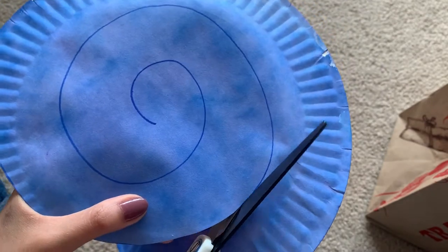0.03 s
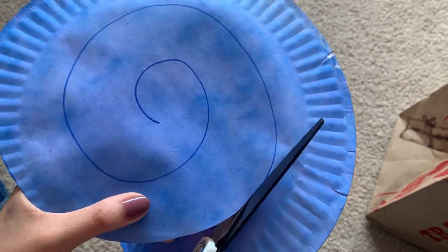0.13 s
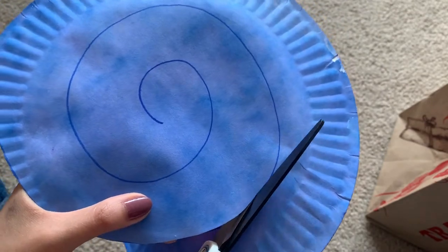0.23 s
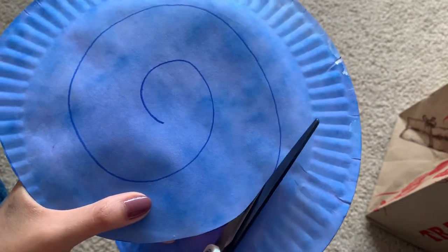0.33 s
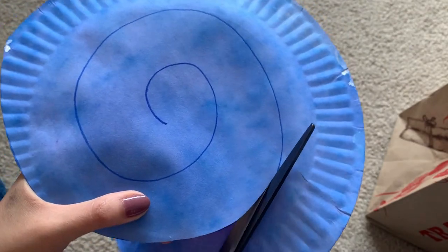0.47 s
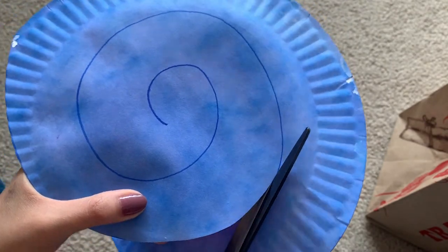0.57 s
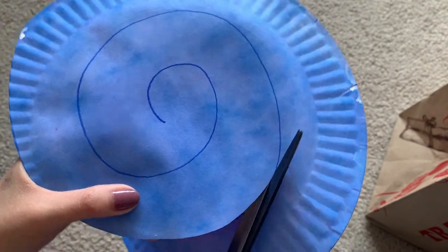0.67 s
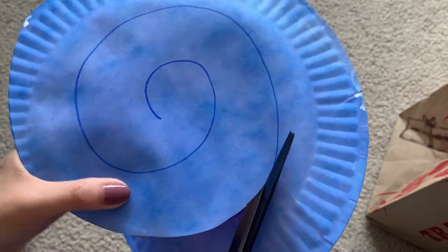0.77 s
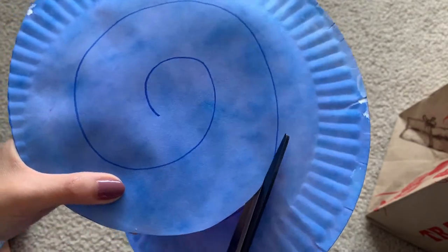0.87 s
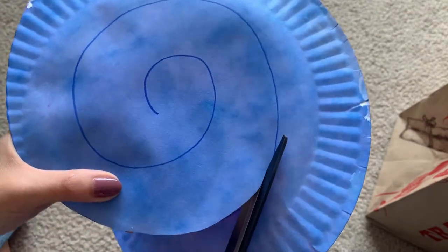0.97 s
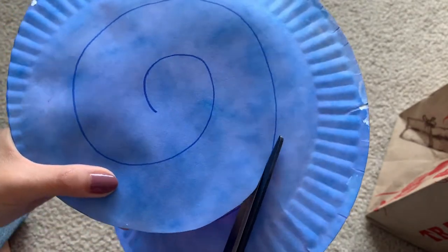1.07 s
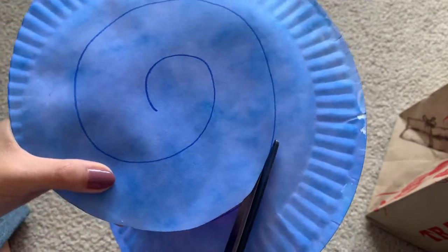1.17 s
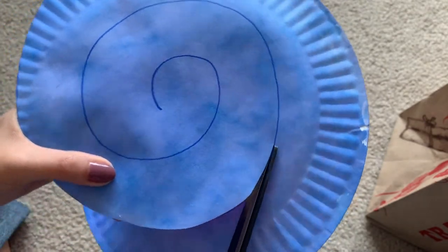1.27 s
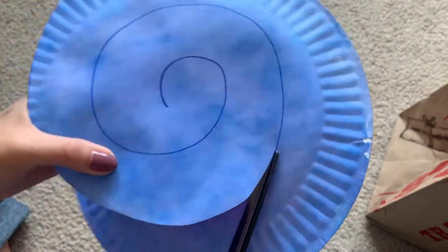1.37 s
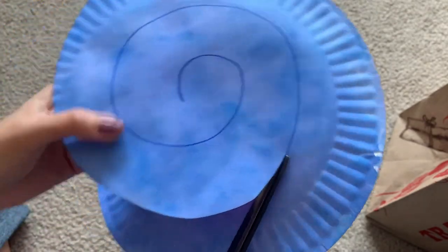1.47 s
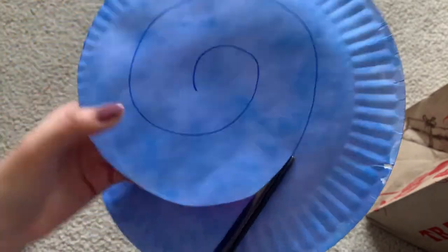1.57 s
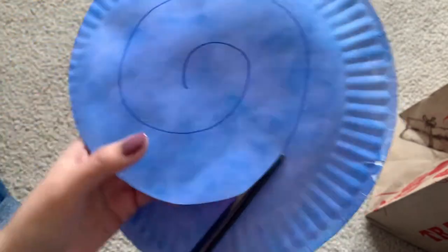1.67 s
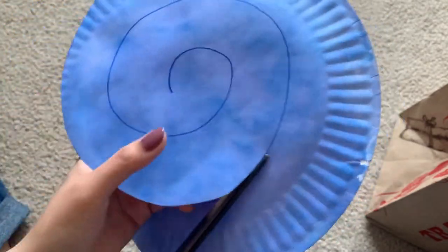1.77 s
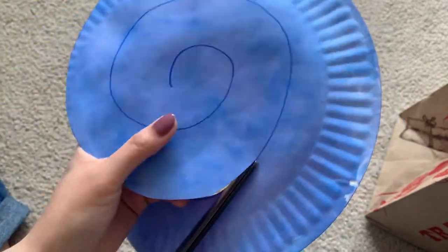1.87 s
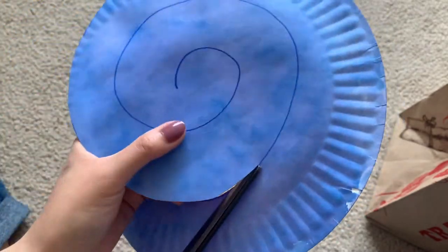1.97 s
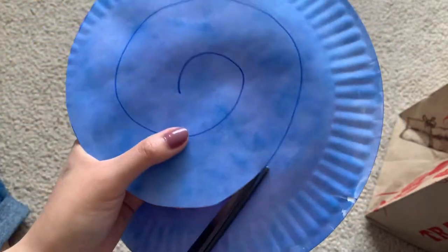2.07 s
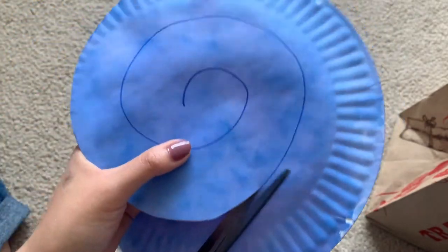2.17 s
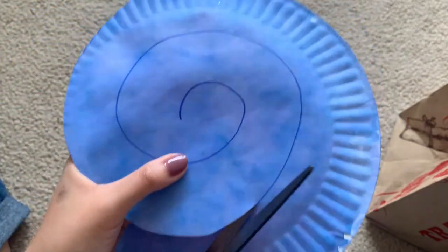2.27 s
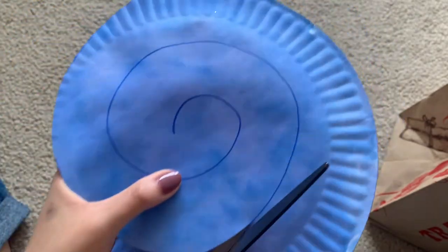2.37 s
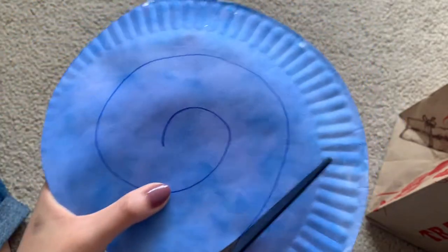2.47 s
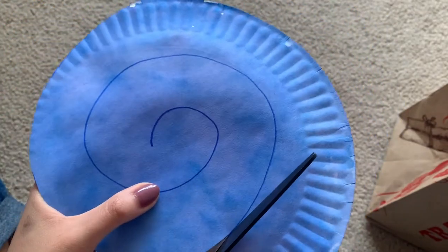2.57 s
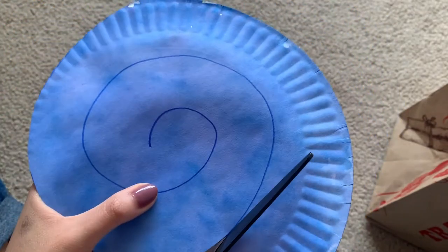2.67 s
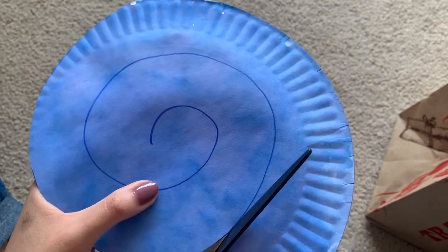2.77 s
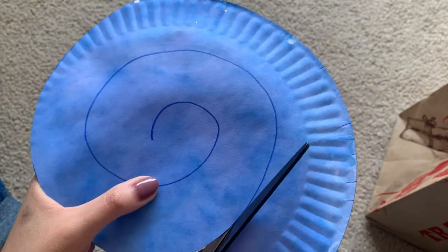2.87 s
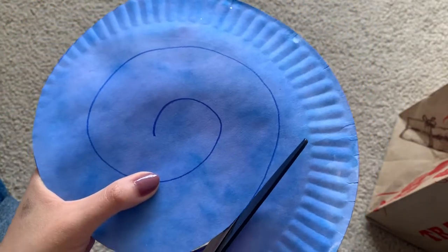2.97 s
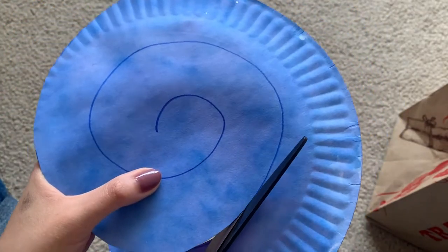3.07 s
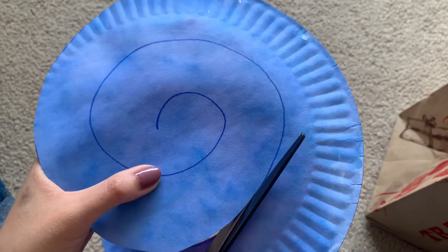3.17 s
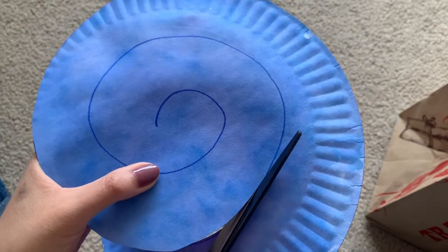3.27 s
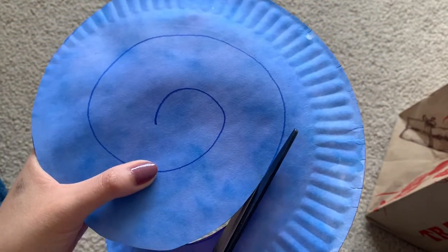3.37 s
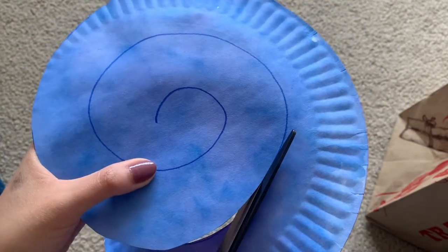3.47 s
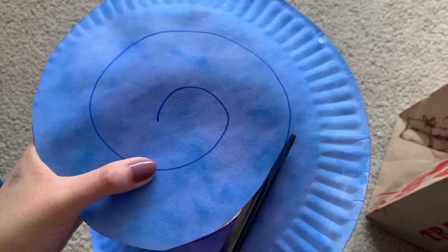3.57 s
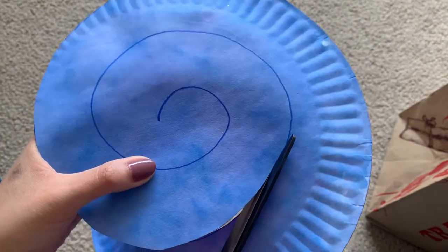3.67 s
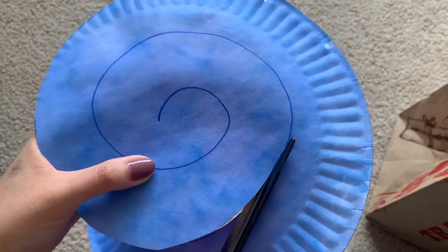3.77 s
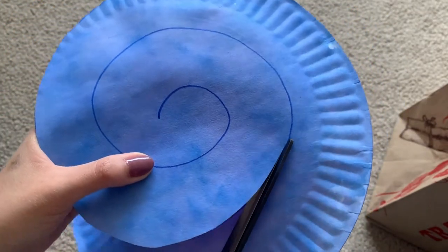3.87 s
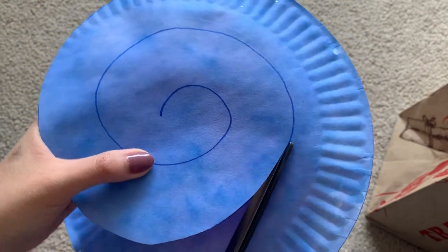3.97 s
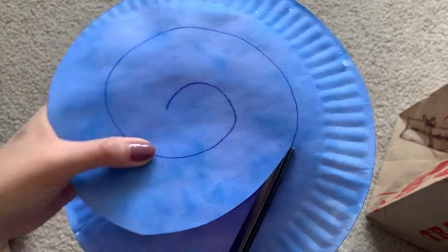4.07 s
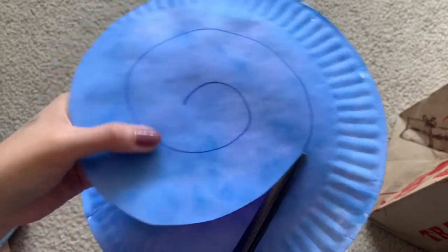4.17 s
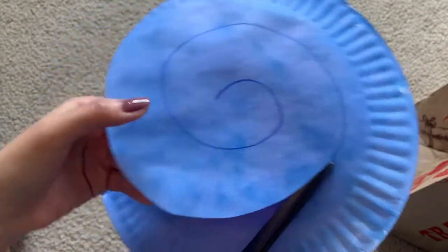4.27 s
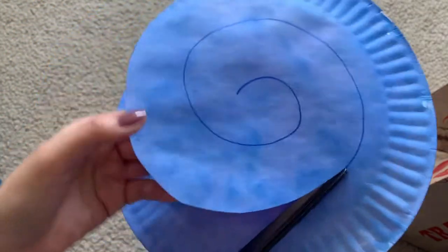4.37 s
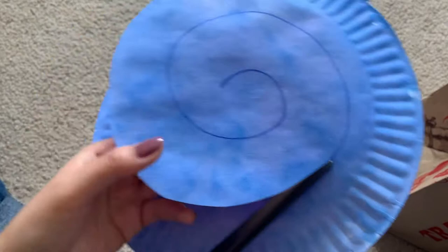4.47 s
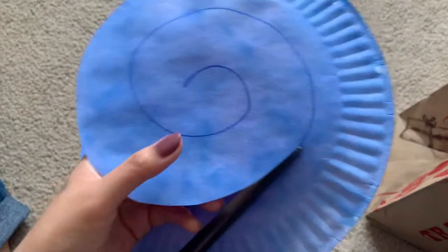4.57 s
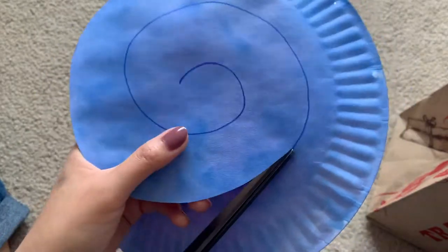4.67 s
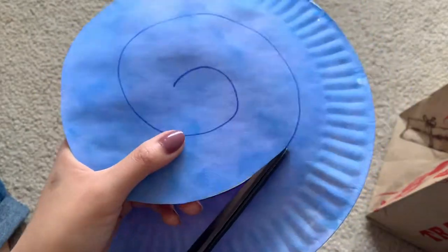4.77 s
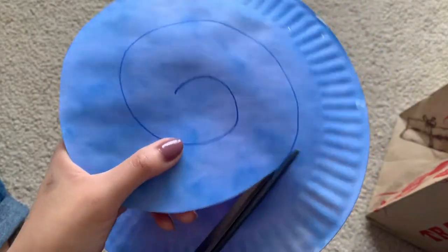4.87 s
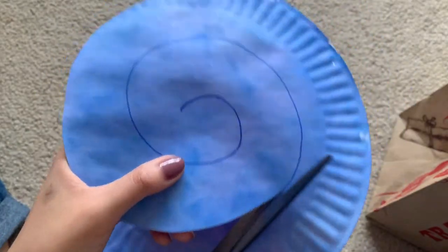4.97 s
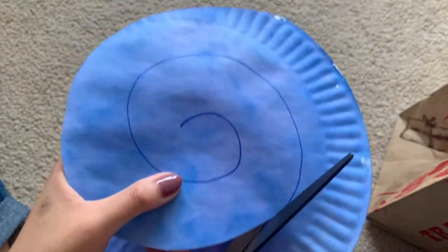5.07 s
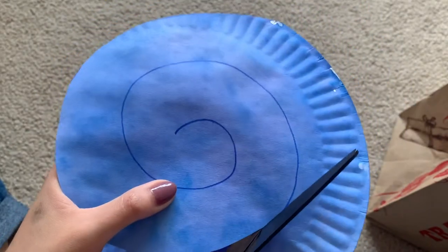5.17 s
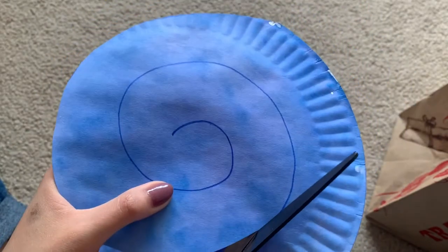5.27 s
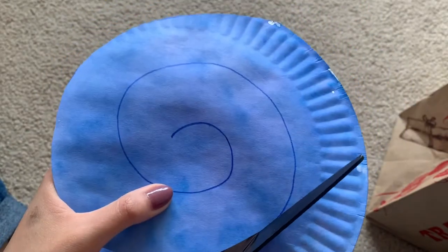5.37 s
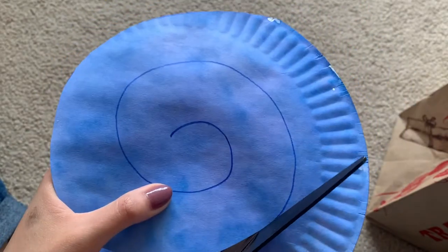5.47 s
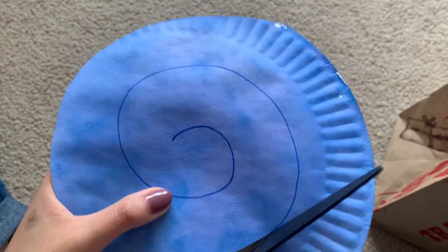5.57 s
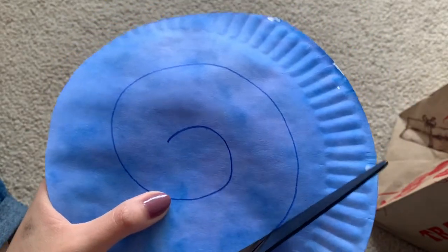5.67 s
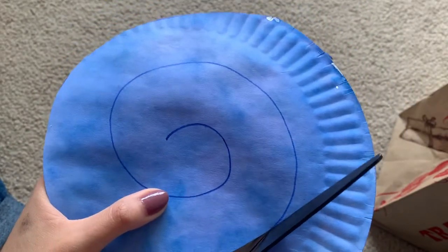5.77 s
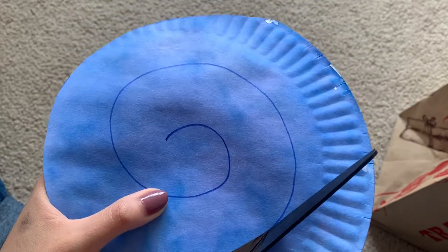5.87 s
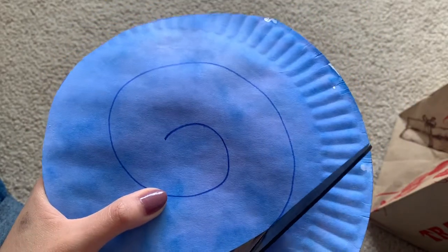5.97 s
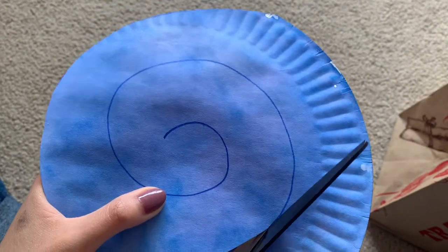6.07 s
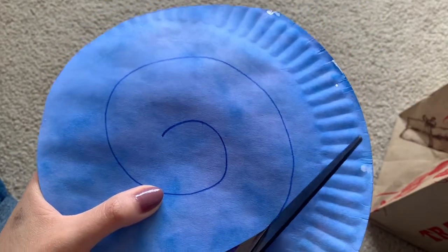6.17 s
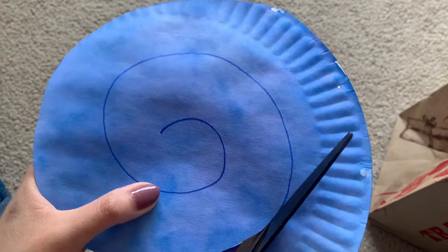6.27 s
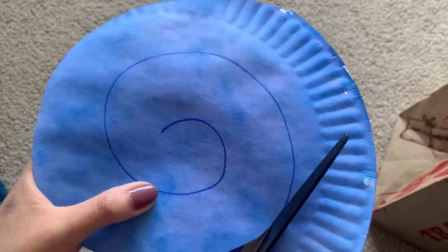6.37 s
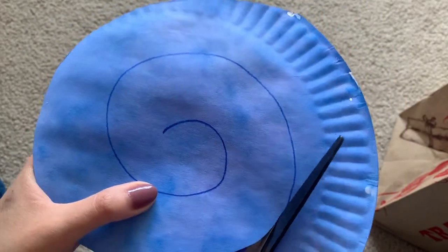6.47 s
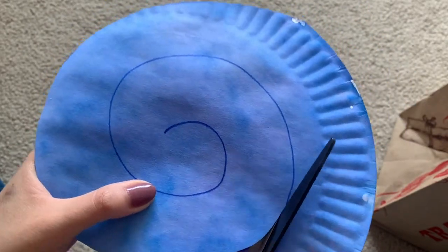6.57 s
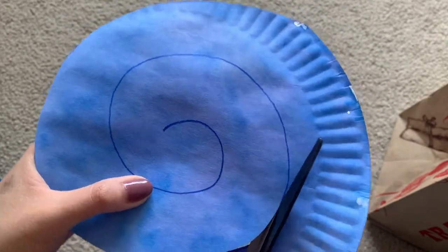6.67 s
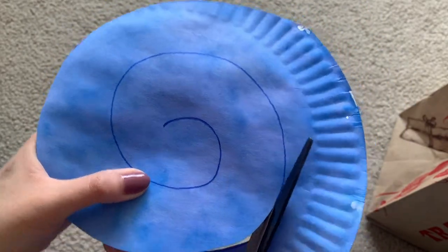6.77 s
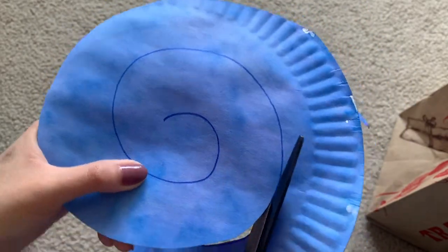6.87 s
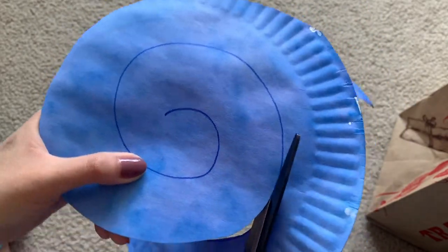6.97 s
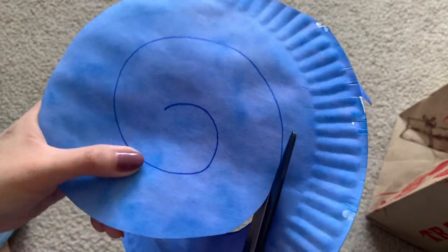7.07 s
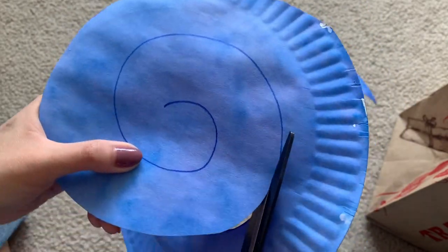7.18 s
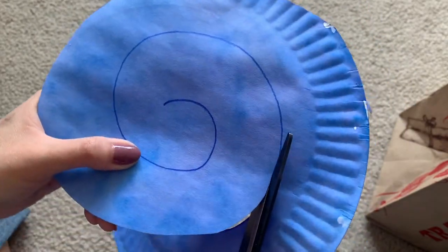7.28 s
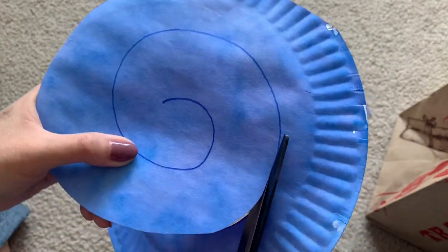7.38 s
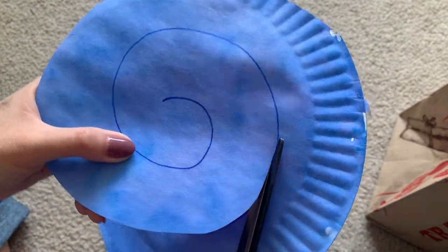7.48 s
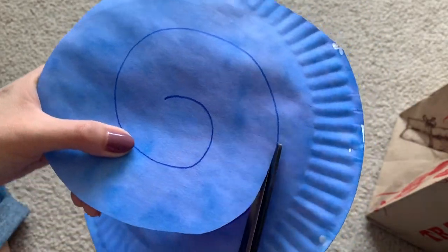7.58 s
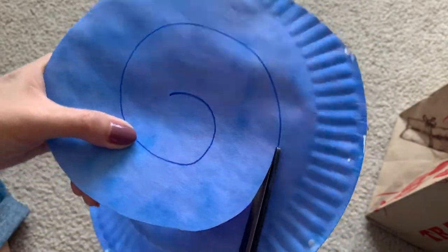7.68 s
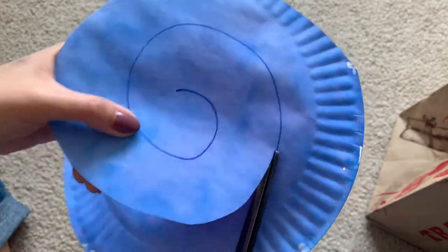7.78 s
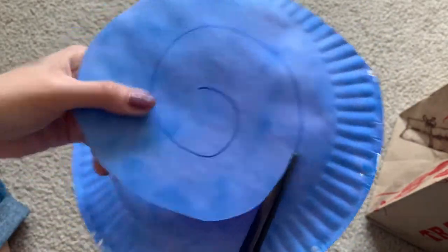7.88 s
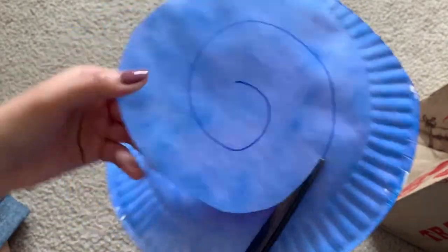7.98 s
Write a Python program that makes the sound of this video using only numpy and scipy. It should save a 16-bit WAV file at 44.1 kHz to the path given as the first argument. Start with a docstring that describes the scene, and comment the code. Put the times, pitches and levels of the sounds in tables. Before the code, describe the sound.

Close, dry snips and ripping crackles of scissors in stiff paper, broken by soft handling rustles and hollow plate knocks over a faint hum.

```python
"""Scissors cut a stiff paper plate held close to a two-port microphone in a carpeted room.
0-1.3 s: blades bite in jerks; each slip is an enveloped grain burst, coloured as tear and plate ring.
1.3-2.7 s: the plate is turned; filtered catches rub on steel and fingers, low resonances flex.
2.7-4.1 s: second cut; 4.1-5.7 s: turning again; 5.7-7.7 s: third cut, hardest slip near 7.5 s; then rubbing.
Throughout: decaying sines knock, bands of grains rasp, the plate wobbles; shaped noise hums under it all."""
import sys
import numpy as np
from scipy import signal
from scipy.fft import rfft, irfft, next_fast_len
from scipy.io import wavfile

SR = 44100
rng = np.random.default_rng(int(sys.argv[2]) if len(sys.argv) > 2 else 0)


def output_pcm(signal):
    """Save a mono or channel-first signal as 16-bit PCM at the path in sys.argv[1].

    Samples are clipped to [-1, 1] before scaling.
    """
    pcm = np.clip(np.atleast_2d(signal).T, -1, 1) * 32767
    wavfile.write(sys.argv[1], SR, np.round(pcm).astype(np.int16))


N = 354343
SIZE = next_fast_len(N)   # transform length, samples

# Slips of the blades: t/s, tear level/dB, plate ring re tear/dB (both before layer trims)
SLIPS = [(0.023, -44.5, 3.5), (0.073, -32, -0.5), (0.111, -48, 5), (0.132, -47, 10), (0.146, -47.5, 7.5),
         (0.168, -36, 5), (0.269, -29.5, 3.5), (0.296, -30, 2.5), (0.37, -37, -1), (0.404, -33.5, 3),
         (0.45, -28, -3), (0.485, -33, -6), (0.532, -21, -6.5), (0.567, -33, -6.5), (0.581, -37.5, -0.5),
         (0.6315, -30, 0.5), (0.748, -36, 3), (0.8198, -41.5, 7.5), (0.836, -31, 0.5), (0.88, -39.5, 6.5),
         (0.9202, -35.5, -3), (0.9398, -31, 2.5), (0.986, -37.5, 6.5), (0.9979, -39, 2), (1.0959, -22.5, 0),
         (1.119, -28, -3), (1.205, -16, -5), (1.255, -19, -7.5), (1.2935, -18, -9.5), (1.63, -50.5, -12),
         (2.0503, -41, 3.5), (2.7356, -41.5, -0.5), (2.775, -41.5, 0.5), (2.813, -38, 0.5),
         (2.851, -42.5, -0.5), (2.8777, -39.5, 3), (2.9113, -31.5, 0), (2.9516, -37.5, 4),
         (2.988, -51.5, 14), (3.014, -32.5, 2), (3.043, -34.5, 2), (3.0718, -37, -12), (3.127, -27.5, -1),
         (3.16, -41.5, 5), (3.197, -47.5, 0.5), (3.205, -41, -5.5), (3.2122, -19, -7), (3.263, -53.5, 2.5),
         (3.272, -39.5, 2), (3.281, -26, 0.5), (3.324, -37, 4), (3.3425, -28.5, -0.5), (3.378, -38.5, 1),
         (3.4119, -23, -3), (3.463, -38, 2), (3.504, -25, -1), (3.5271, -26, 0.5), (3.578, -43.5, 5),
         (3.696, -26.5, -4.5), (3.8279, -18.5, -8.5), (3.8326, -17.5, -12.5), (3.8546, -36.5, 2.5),
         (3.8707, -16.5, -12), (3.95, -32.5, -1.5), (3.975, -16, -9), (4.002, -43, 7.5), (4.014, -41, 7.5),
         (4.028, -16, -8.5), (4.066, -40.5, 6.5), (4.669, -48.5, -10), (4.797, -50.5, 4),
         (5.5717, -31.5, -7.5), (5.583, -27, -8.5), (5.9367, -47.5, 11.5), (6.026, -35.5, 0),
         (6.105, -53.5, 12.5), (6.136, -37.5, 4.5), (6.214, -42.5, 6.5), (6.266, -46.5, 15),
         (6.436, -44.5, 7), (6.472, -38, 7), (6.518, -35, 3), (6.574, -36.5, 3), (6.6192, -28, -1),
         (6.6858, -37.5, 1.5), (6.7123, -37.5, 2), (6.8038, -29, 0), (6.9415, -34.5, -2.5),
         (6.963, -36, -5), (6.982, -33, -1.5), (7.0329, -34, 6.5), (7.061, -31, 3), (7.075, -34, -3),
         (7.111, -44.5, 3), (7.198, -28, -7.5), (7.257, -25.5, -7.5), (7.2998, -27.5, -8.5),
         (7.35, -19.5, -9), (7.4561, -12, -11.5), (7.511, -29.5, -0.5), (7.5584, -30, -4),
         (7.655, -19, -5.5), (7.6743, -15, -11), (7.898, -31.5, -1.5)]
# Spans in which the blades close on paper: start/s, end/s
CUT_SPANS = [(0, 1.33), (2.73, 4.06), (5.75, 7.7)]
# Tear spectrum: f/Hz, relative density/dB
TEAR_SPECTRUM = [(1000, -37.5), (1330, 5), (1560, -12), (1970, 5.5), (3050, -1), (4590, 5), (7090, -4),
                 (10100, -12.5), (11600, -7), (14700, -14.5), (16500, -31)]
# Treble of the tearing as the cut moves along the blades: t/s, level/dB
TEAR_TREBLE = [(0, 4), (1.3, 6), (2.9, -2), (3.2, 5), (3.5, 8), (3.85, 1.5), (4.05, 8.5), (5.6, -26),
               (7.3, 3), (7.46, -3.5), (7.56, 6), (7.67, 1.5)]
# Broad resonances of the freshly cut edge: f/Hz, width/Hz, relative level/dB
EDGE_MODES = [(2970, 490, 6), (5166, 130, 18), (8610, 3400, 13.5)]
# Plate resonances: f/Hz, width/Hz, relative level/dB
RING_MODES = [(659, 120, 12.5), (797, 93, 17), (927.7, 144.4, 13), (1323.8, 155.5, 15.5), (1250, 1076, 8),
              (2077.7, 229, 11.5), (2448, 222.6, 1)]
# Upper flexing resonances: f/Hz, width/Hz, relative level/dB
FLEX_MODES = [(273.85, 91.8, -0.6), (335.7, 74.7, 2), (407.5, 74.6, -1.5)]
# Plate buckles and knocks: t/s, level before swell/dB, nominal f/Hz, fade by 8.7 dB/cycles
KNOCKS = [(0.44, -27.5, 332, 1.56), (0.488, -24, 373, 1.02), (0.532, -17, 419, 0.58),
          (0.885, -30, 356, 1.07), (0.923, -30, 337, 0.91), (0.943, -34.5, 385, 1.52),
          (1.129, -36.5, 233, 1.55), (1.226, -29.5, 142, 0.62), (1.309, -32.5, 823, 2.26),
          (1.639, -30.5, 191, 0.3), (2.3737, -34, 720, 1.23), (2.913, -35, 990, 4), (3.015, -39.5, 880, 4),
          (3.047, -42, 843.5, 6), (3.078, -40.5, 887, 1), (3.953, -32, 448, 1.27), (4.033, -25, 281.4, 1.6),
          (4.67, -39.5, 167, 1.15), (5.593, -33.5, 219, 0.27), (5.609, -24, 271.4, 0.5),
          (5.728, -55.5, 784, 5.5), (5.788, -54.5, 799.4, 4.5), (6.474, -28.5, 144.4, 0.92),
          (6.61, -23, 175.7, 0.63), (6.808, -34, 400, 0.9), (6.946, -32, 298, 1.06),
          (6.986, -30, 300, 0.68), (7.037, -27, 273, 0.84), (7.064, -23, 327, 0.52),
          (7.203, -37, 403, 2.04), (7.262, -44, 402, 4), (7.353, -35, 383.5, 2), (7.4875, -19.5, 739, 1.24),
          (7.489, -17.5, 340, 0.54), (7.497, -31.5, 163, 0.02), (7.662, -24.5, 303, 1.11),
          (7.682, -18, 316, 0.5048), (7.902, -26.5, 331, 0.87), (7.936, -22, 150, 0.4)]
# Cut edge rasps along the steel, and a short handling bump near 5.83 s: start/s, end/s, f/Hz, width/Hz,
# level/dB
RASPS = [(0.538, 0.62, 2400, 350, -63.5), (0.659, 0.757, 2460, 350, -50.5), (0.662, 0.724, 1217, 400, -52),
         (0.659, 0.759, 4100, 600, -55.5), (1.847, 1.919, 1995, 202, -59), (2.059, 2.25, 2144, 500, -58.5),
         (2.313, 2.478, 1963, 243, -57.5), (3.273, 3.284, 960, 300, -42), (3.407, 3.444, 2510, 300, -57.5),
         (5.094, 5.14, 1389, 590, -44.5), (5.106, 5.158, 2400, 398, -50.5),
         (5.301, 5.363, 939, 600.3, -59.5), (5.825, 5.85, 820, 200.3, -53), (6.26, 6.362, 1865, 500, -55),
         (6.826, 6.926, 2590, 500, -56), (6.83, 6.918, 1070, 500, -61.5), (7.463, 7.57, 3900, 2491, -54),
         (7.651, 7.683, 3930, 1490, -37)]
# Paper strokes on steel or fingers: start/s, end/s, hiss level at start/dB, at end/dB,
# then re hiss, before layer trims: treble/dB, plate ring/dB, upper flexing/dB, deep flexing/dB
STROKES = [(-0.05, 0.228, -51.5, -58.5, 4.5, 5, 16.5, 7.5), (0.269, 0.408, -49.5, -55, 5, 3.5, 20, 10),
           (0.416, 0.569, -57.5, -58.5, 0, 6, 12.5, 7.5), (0.564, 0.755, -52.5, -52.5, -0.5, 1, 8.5, -0.5),
           (0.78, 1.018, -49.5, -77.5, -3.5, -10, 17.5, -6), (1, 2.05, -77, -68.5, 4.5, -2, 5, 4.5),
           (1.034, 1.318, -66.5, -55.5, -7, -5, 18, 7), (1.418, 1.753, -60.5, -64, 8.5, -8.5, -1, -2),
           (1.741, 1.888, -63.5, -62.5, 8, -6, 0, -18.5), (1.855, 1.921, -54.5, -71.5, -26, -6.5, 17, 16.5),
           (2.036, 2.424, -53, -49, 6, -6, 1, -8), (2.444, 2.485, -39, -60, 10, 0, 12, 10.5),
           (2.706, 3.04, -65, -67.5, 1.5, 0, -12, 3.5), (2.99, 3.644, -70.5, -60.5, -3, 5, 10, 12),
           (3.704, 4.8, -76, -71, 2.5, -7, 6, 7), (3.77, 4.061, -69.5, -64.5, 0, 5, 23, 11.5),
           (4.162, 4.327, -56.5, -80, 7.5, -11, -6.5, -20), (4.411, 4.596, -68, -59, 10.5, -8, -9.5, -20.5),
           (4.794, 5.129, -52, -48.5, 7, -5.5, 3, -8.5), (5.144, 5.566, -70.5, -77.5, -22, 5, 19, 10.5),
           (5.561, 5.656, -41, -63.5, 5.5, -1.5, 12.5, 1), (5.7, 5.883, -85.5, -71.5, -8, 11.5, 23.5, 19),
           (5.928, 6.152, -54, -71, -19, 5, 12.5, 11), (6.157, 6.258, -52.5, -61.5, -8, 5, 12, 12),
           (6.25, 6.352, -53, -53, 1, 4.5, 8, 13.5), (6.407, 6.799, -52.5, -60, 4.5, 1, 14, 9),
           (6.775, 6.946, -53, -58.5, -8.5, -4, 2.5, 0.5), (6.926, 7.146, -71.5, -60.5, -17, -4, 16.5, 2),
           (7.161, 7.428, -86, -61.5, -22, -3, 19.5, 12.5), (7.462, 8.04, -52, -82, 1, -4.5, 14.5, 1.5),
           (7.826, 7.934, -54.5, -59.5, 9, -5, 2.5, 5)]
# Rubbing spectrum: f/Hz, relative density/dB
RUB_SPECTRUM = [(590, -79), (1000, -50.5), (1970, 5), (2500, 2.5), (3300, 3.5), (6380, 1), (7260, -0.5),
                (8860, -2.5), (10300, -8.5), (11500, -15.5), (12600, -10), (14500, -15), (15600, -15.5),
                (16500, -66)]
# Deep flexing resonances: f/Hz, width/Hz, relative level/dB
DEEP_FLEX_MODES = [(129.5, 98.6, 0.019), (206.8, 73.1, 0.014)]
# Whole plate wobbles in the hand: t/s, level before trim/dB
SWAY = [(0.0, -48.5), (0.29, -44.5), (1.03, -56.5), (1.23, -44.5), (1.52, -60), (1.65, -46.5),
        (1.94, -58.5), (4.09, -48.5), (4.38, -60), (4.65, -51.5), (5.61, -53.5), (6.15, -55), (6.51, -46),
        (6.82, -55), (7.47, -54.5), (8.03, -50)]
# Wobble pitch as the grip changes: t/s, f/Hz
GRIP = [(0, 98.67), (.8, 123.1), (1.6, 88.1), (2.0, 91.13), (2.1, 117.4), (2.5, 90.9), (3.7, 118.7),
        (6.1, 119), (6.3, 88.13), (6.9, 121.4), (7.7, 86.2), (8.03, 110.8)]
# Steady wobble resonance: f/Hz, width/Hz, relative level/dB
WOBBLE_MODES = [(62.9, 18, -2)]
# Lead of the left port: f/Hz, phase/rad
PORT_LEAD = [(0, 0), (1030, .5), (2410, 1.5), (2760, 2.3), (4910, 4.2), (7150, 3.9), (8610, .4),
             (10200, -.3), (10900, -2.9), (12300, -3.4), (13200, -6.0), (15500, -8)]
# Left port above right: f/Hz, level/dB
PORT_BALANCE = [(60, 2), (120, -1.5), (240, -1), (480, 4.5), (950, 1), (1890, 2.5), (3770, -11), (7520, -4),
                (15000, 4)]
# Hum spectrum: f/Hz, relative density/dB
HUM_SPECTRUM = [(30, -63.5), (75, -5.5), (98, -3.5), (121, -19), (184, -71), (437, -29), (988, -29),
                (3140, -55.5), (16000, -90.5)]
# Left-right likeness of the hum: f/Hz, likeness/1
HUM_LIKENESS = [(60, 1), (950, 0.02), (15000, 0.32)]

# skirt: faint burst either side of each slip; its random size also scales its decay time
SKIRT_DB, SKIRT_SPREAD_DB, SKIRT_MS = -22, 5, 2.2
RAGGED_DB = 3   # spread of the clumps in a tear
# drag: level for a -30 dB slip, dB per dB of slip; its ring: level for tear + ring = -32 dB
DRAG_DB, DRAG_FOLLOWS, DRAG_T60_S, DRAG_TREBLE_DB = -53, 0.79, 0.066, 5.5
DRAG_RING_DB, DRAG_RING_FOLLOWS = -52.5, 0.8
RUMBLE_UPPER_DB, RUMBLE_DEEP_DB, RUMBLE_T60_S = -23, -20, 0.1437   # re knock, before flexing trims
TOUCH_S, LIFT_DB_PER_S = 0.0453, 339   # stroke onset; die-away after its end
WAVER_DB, WAVER_HZ = 1.1, 11   # unsteady stroke pressure
RASP_EDGE_S = 0.0052
WIDE_RUB_DB, WIDE_TEAR_DB = -5, -9.5   # port-swapped layers
ROOM_T60_S, ROOM_DB, WALL_CUT_HZ = 0.146, -11, 3420
HUM_DB = -66
STOPBAND_HZ = 16700


def from_db(db):
    """Amplitude gain of a level in dB."""
    return 10 ** (np.asarray(db) / 20)


def rms_one(x):
    """Scale to rms 1."""
    return x / np.sqrt(np.mean(x ** 2) + 1e-20)


def in_time(rows):
    """Columns of a time table, interpolated to one value per sample."""
    s, *columns = np.transpose(rows)
    return [np.interp(np.arange(N) / SR, s, c) for c in columns]


def at_hz(points):
    """Frequency table on the transform grid, interpolated over log frequency."""
    hz, value = np.transpose(points)
    grid_hz = np.fft.rfftfreq(SIZE, 1 / SR)
    return np.interp(np.log(grid_hz + 1), np.log(hz + 1), value)


def colour(x, spectrum):
    """Smooth spectral shape; white input keeps its rms."""
    return irfft(rfft(x, SIZE) * rms_one(from_db(at_hz(spectrum))), SIZE)[:N]


def resonate(x, modes, uneven_db=0):
    """Parallel alternating-sign resonances, drive drifting with the contact; white input keeps its rms."""
    out, reply = 0, 0
    for k, (hz, width_hz, level_db) in enumerate(modes):
        r = np.exp(-np.pi * width_hz / SR)
        a = [1, -2 * r * np.cos(2 * np.pi * hz / SR), r * r]
        b = (-1) ** k * from_db(level_db) * (1 - r * r) * np.array([1, 0, -1])
        drive = from_db(uneven_db * drift(8.23)) if uneven_db else 1
        out = out + signal.lfilter(b, a, x * drive + 1e-18)
        reply = reply + signal.lfilter(b, a, signal.unit_impulse(SR // 4))
    return out / np.sqrt(np.sum(reply ** 2))


def drift(corner_hz):
    """Random wander of rms 1: noise through a double pole."""
    r = np.exp(-2 * np.pi * corner_hz / SR)
    wander = signal.lfilter([1], [1, -2 * r, r * r], rng.standard_normal(N + SR))
    return rms_one(wander[SR:])   # filter settled


def grains(per_s, spread_db):
    """Fibres that snap or catch at random moments, of uneven size; rms 1."""
    sizes = from_db(spread_db * np.minimum(rng.exponential(1, N), 4))
    signed = sizes * rng.choice([-1, 1], N)
    return rms_one(signed * (rng.random(N) < per_s / SR))


def tails(s, levels_db, t60_s):
    """Gain that jumps at each moment and dies away exponentially."""
    kicks = np.full(N, 1e-18)
    kicks[(s * SR).astype(int)] = from_db(levels_db)
    return signal.lfilter([1], [1, -from_db(-60 / (t60_s * SR))], kicks)


def blades():
    """Each slip tears fibres, sings in the cut edge, rings the plate and, longer, flexes it."""
    s, tear_db, ring_db = np.transpose(SLIPS)
    fibres = rms_one(grains(14000, 4.88) * from_db(RAGGED_DB * drift(320)))
    skirts_db = np.clip(rng.normal(0, SKIRT_SPREAD_DB, len(s)), -10, 10)
    tearing = fibres * bursts(tear_db - 10.5, 3.505, skirts_db)
    edge = resonate(tearing, EDGE_MODES, uneven_db=7.5)
    tear = colour(tearing, TEAR_SPECTRUM) + from_db(-13) * edge
    top = signal.sosfilt(signal.butter(2, 6500, "high", fs=SR, output="sos"), tear)
    tear = tear + (from_db(in_time(TEAR_TREBLE)[0]) - 1) * top
    ring_drive = fibres * bursts(tear_db + ring_db - 8.5, 3.6368, skirts_db)
    ring = resonate(ring_drive, RING_MODES, uneven_db=3)
    thump_drive = fibres * bursts(tear_db + ring_db - 15, 9.0602, skirts_db)
    return tear + ring + resonate(thump_drive, FLEX_MODES)


def bursts(levels_db, swell_ms, skirts_db):
    """Envelope of all slips: each tear swells and dies away, in a faint skirt of random size."""
    u = np.arange(SR // 16) / (SR * swell_ms / 1000)   # tear peaks at u = 1
    around = np.arange(-SR // 25, SR // 16) / (SR * SKIRT_MS / 1000)   # 0 at the slip
    out = np.zeros(N + SR)
    for (s, *_), level_db, skirt_db in zip(SLIPS, levels_db, skirts_db):
        # skirt swells before the slip and fades after it
        shape = from_db(SKIRT_DB + skirt_db) * np.exp(-np.abs(around) / from_db(skirt_db))
        shape[-len(u):] += (u * np.exp(1 - u)) ** 3.5
        at = round(s * SR)
        out[at:at + len(shape)] += from_db(level_db) * shape
    return out[len(around) - len(u):][:N]   # drop the lead-in


def knocks():
    """Buckling plate pops: a sine swells, fades by the cycle and falls slightly as the paper relaxes."""
    out, t = np.zeros(N + SR), np.arange(SR // 10) / SR
    for s, level_db, hz, fade_cycles in KNOCKS:
        cycles = hz * t
        at = round(s * SR)
        swell = (1 - np.exp(-cycles / 0.98)) * np.exp(1 - cycles / fade_cycles)
        out[at:at + len(t)] += from_db(level_db) * swell * np.sin(2 * np.pi * cycles ** 0.985)
    return out[:N]


def rasps():
    """Rasps and a handling bump: clumped fibre catches through the band of each row."""
    out, catch = np.zeros(N + SR), grains(5000, 4.6) * from_db(1.24 * drift(60))
    for start, end, hz, width_hz, level_db in RASPS:
        t = np.arange(round(start * SR), round(end * SR) + SR // 20)
        gate = np.minimum(t / SR - start, end + RASP_EDGE_S - t / SR) / RASP_EDGE_S
        gate = np.clip(gate, 0, 1)
        edges_hz = [hz - width_hz / 2, hz + width_hz / 2]
        band = signal.sosfilt(signal.butter(2, edges_hz, "band", fs=SR, output="sos"), catch[t] * gate)
        out[t] += from_db(level_db) * band * np.sqrt(SR / 2 / width_hz)   # offset the band loss
    return out[:N]


def strokes():
    """Gains of hiss, treble, ring, upper and deep flexing: strokes set in, run their course, die away."""
    out = np.full((5, N), 1e-6)
    for start, end, start_db, end_db, *layers_db in STROKES:
        at = max(round(start * SR), 0)
        t = np.arange(at, min(round(end * SR) + SR // 4, N)) / SR
        level_db = np.interp(t, [start, end], [start_db, end_db])
        level_db = level_db - LIFT_DB_PER_S * np.maximum(t - end, 0)
        gain = np.minimum((t - start) / TOUCH_S, 1) * from_db(level_db)
        out[:, at:at + len(t)] += gain * from_db([0, *layers_db])[:, None]
    return out * from_db(WAVER_DB * drift(WAVER_HZ))


def rubbing(hiss_gain, treble_gain, ring_gain):
    """Paper slides on blades and fingers: fine catching in clumps hisses and rings the plate."""
    clumps = drift(52)
    catch = grains(9000, 3.48) * crunch()
    hiss = colour(catch * hiss_gain * from_db(2.0 * clumps), RUB_SPECTRUM)
    top = signal.sosfilt(signal.butter(2, 6000, "high", fs=SR, output="sos"), hiss)
    hiss = hiss + (treble_gain / hiss_gain - 1) * top
    ring_drive = catch * ring_gain * from_db(1.5 * clumps)
    return hiss + resonate(ring_drive, RING_MODES, uneven_db=3)


def crunch():
    """Tiny random slips crackle the rubbing while the blades close, fainter elsewhere; rms-1 gains."""
    u = np.arange(SR // 50) / (SR * 0.00316)
    slips = np.abs(grains(300, 4.0))
    pulses = rms_one(signal.fftconvolve(slips, u * np.exp(-u))[:N])
    chopped = rms_one(.5 + pulses)
    t = np.arange(N) / SR
    closing = sum((t >= start) & (t < end) for start, end in CUT_SPANS)
    return np.where(closing, chopped, rms_one(2 + chopped))


def flexing(upper_gain, deep_gain):
    """The dish bends under hand and blades: noise rumbles in its low modes."""
    upper_drive = rng.standard_normal(N) * crunch() * upper_gain * from_db(-6)
    deep_drive = rng.standard_normal(N) * deep_gain * from_db(3.7 * drift(19))
    return resonate(upper_drive, FLEX_MODES) + resonate(deep_drive, DEEP_FLEX_MODES)


def wobble():
    """Plate in the hand: a narrow low resonance moves with the grip over a deeper fixed one."""
    turn = 2 * np.pi * np.cumsum(in_time(GRIP)[0]) / SR
    moving = drift(10.74) * np.cos(turn) + drift(15.0) * np.sin(turn)
    steady = from_db(-4) * resonate(rng.standard_normal(N), WOBBLE_MODES)
    return from_db(in_time(SWAY)[0] - 2.5) * (moving + steady)


def ports(x):
    """Two ports hear a near source with frequency-dependent lead and shading, split evenly."""
    half = from_db(at_hz(PORT_BALANCE) / 2) * np.exp(.5j * at_hz(PORT_LEAD))
    return irfft(rfft(x, SIZE) * np.array([half, 1 / half]), SIZE)[:, :N]


def reflections(x, t60_s, likeness):
    """Dense dull reflections: decaying filtered noise, partly different at each port."""
    t = np.arange(SR // 3) / SR
    tail = rng.standard_normal((2, len(t))) * from_db(-60 * t / t60_s)
    dull = np.exp(-2 * np.pi * WALL_CUT_HZ / SR)
    tail = signal.lfilter([1], [1, -dull], tail)
    alike = np.clip(likeness, 0, 1)
    tail[1] = alike * tail[0] + np.sqrt(1 - alike ** 2) * tail[1]
    tail = signal.sosfilt(signal.butter(2, 400, "high", fs=SR, output="sos"), tail)
    return signal.fftconvolve(x, tail / np.sqrt(np.sum(tail[0] ** 2)), axes=1)[:, :N]


def hum():
    """Low hum of the house over faint hiss: shaped noise, most alike at the ports in the bass."""
    mid, side = rfft(rng.standard_normal((2, SIZE)))
    alike = np.clip(at_hz(HUM_LIKENESS), 0, 1)
    pair = np.sqrt(1 + alike) * mid + np.sqrt(1 - alike) * side * [[1], [-1]]
    return from_db(HUM_DB) * rms_one(irfft(pair * from_db(at_hz(HUM_SPECTRUM)), SIZE)[:, :N])


def scene():
    """Plate and scissors at the ports, widened rubbing and tearing, walls, hum."""
    hiss, treble, ring, upper, deep = strokes()
    # freed paper drags on the blade after each slip
    s, tear_db, ring_db = np.transpose(SLIPS)
    drag_ring = tails(s, DRAG_RING_DB + DRAG_RING_FOLLOWS * (tear_db + ring_db + 32), DRAG_T60_S)
    drag = tails(s, DRAG_DB + DRAG_FOLLOWS * (tear_db + 30), DRAG_T60_S)
    drag_treble = from_db(DRAG_TREBLE_DB + in_time(TEAR_TREBLE)[0]) * drag
    sliding = hiss + drag, treble + drag_treble, ring + drag_ring
    # the dish rumbles on after each knock
    rumble = tails(*np.transpose(KNOCKS)[:2], RUMBLE_T60_S)
    bending = flexing(upper + from_db(RUMBLE_UPPER_DB) * rumble, deep + from_db(RUMBLE_DEEP_DB) * rumble)
    direct = ports(blades() + knocks() + rubbing(*sliding) + bending + wobble() + rasps())
    # fresh draws with ports swapped: makes rubbing and tearing wider, less alike at the ports
    wide = from_db(WIDE_RUB_DB) * ports(rubbing(*sliding))[::-1]
    wide = wide + from_db(WIDE_TEAR_DB) * ports(blades())[::-1]
    room = from_db(ROOM_DB) * reflections(direct, ROOM_T60_S, likeness=0.043)
    return direct + wide + room + hum()


def record(dry):
    """Steep low-pass, 70 dB down from the stopband edge."""
    return signal.sosfilt(signal.cheby2(12, 70, STOPBAND_HZ, fs=SR, output="sos"), dry)


dry = scene()
out = record(dry)
output_pcm(out)
```